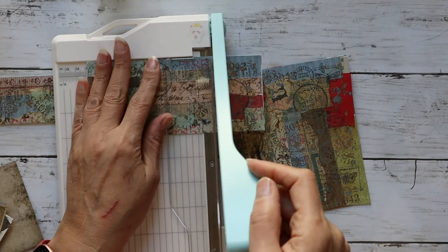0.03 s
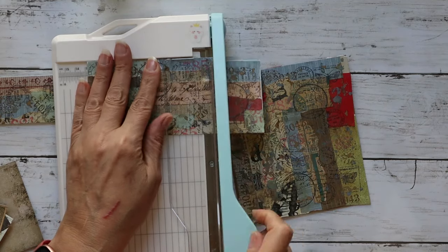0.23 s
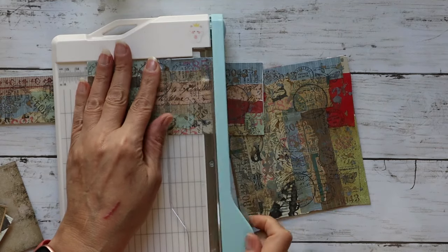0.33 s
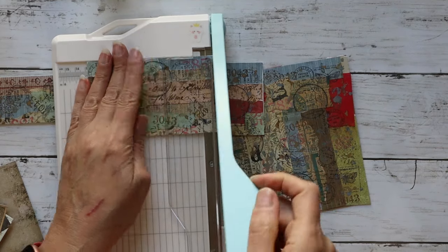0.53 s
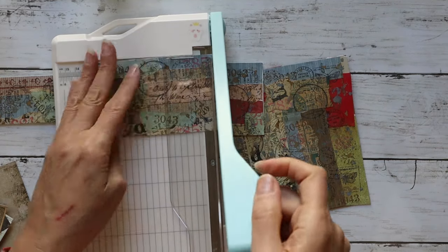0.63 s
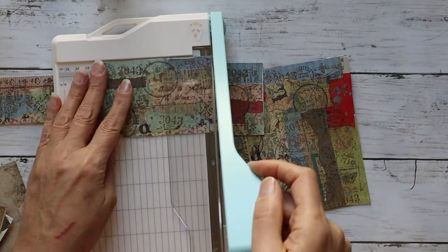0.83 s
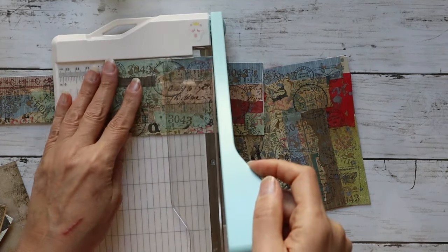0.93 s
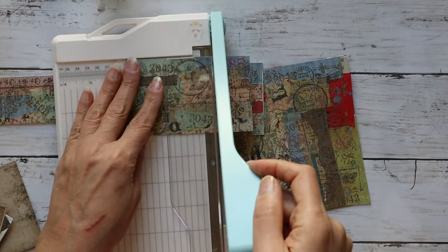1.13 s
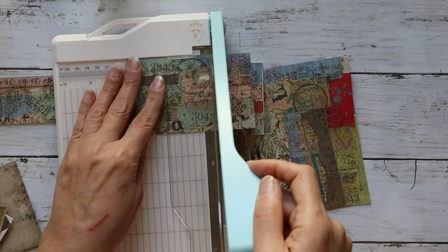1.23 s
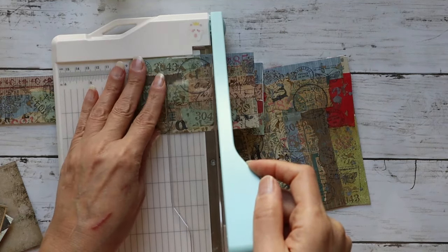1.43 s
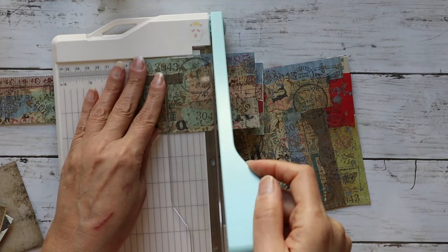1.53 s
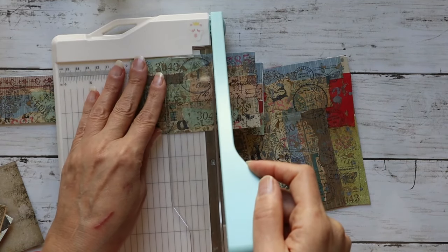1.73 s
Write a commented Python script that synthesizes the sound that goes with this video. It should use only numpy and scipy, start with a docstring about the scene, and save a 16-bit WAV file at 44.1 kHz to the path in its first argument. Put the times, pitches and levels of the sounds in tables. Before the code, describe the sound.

A paper trimmer blade crunches down through paper, then the paper slides softly.

```python
"""Paper trimmer on a craft table

Close up in a quiet room, on a pair of microphones. The lever blade shears down through paper and drags
back up, its edge sticking and slipping: fibres crunch, steel rings, the plastic base and table resonate.
Then a hand nudges and slides the paper, over a steady hush of room air."""
import sys
import numpy as np
from scipy import signal
from scipy.fft import rfft, irfft
from scipy.io import wavfile
from scipy.ndimage import uniform_filter1d

SR = 44100
rng = np.random.default_rng(int(sys.argv[2]) if len(sys.argv) > 2 else 0)


def wav_record(signal):
    """Record a signal, one row per channel, as 16-bit PCM in the file named by sys.argv[1]."""
    frames = np.transpose(np.atleast_2d(signal))
    bounded = np.clip(frames, -1, 1)
    # unit amplitude maps onto the largest positive 16-bit level
    quanta = np.round(bounded * 32767).astype(np.int16)
    wavfile.write(sys.argv[1], SR, quanta)


N = 79380
TIME_S = np.arange(N) / SR

# Blade travel down and back up, in stretches; base, table, thud and fizz are relative to level_db:
# time_s, level_db, base_db, base_pitch_hz, table_db, thud_db, fizz_db
BLADE_TRAVEL = [
    [(0.185, -70.5, -1, 660, 13, -9, -22), (0.203, -43.5, -26, 685, -8.5, -42, -10),
     (0.253, -36.5, -7.5, 580, -9, -37, -11), (0.266, -36, -1.5, 636, -13, -30, -7.5),
     (0.276, -34.5, -8.5, 634, -2, -16, -11), (0.304, -31.5, 3.5, 607, -7.5, -13, -8),
     (0.319, -28, -5, 639, -6.5, -26, -7), (0.33, -29.5, 1.5, 647, -0.5, -9.5, -9)],
    [(0.334, -34, 2, 648, -1.5, -13, -5), (0.344, -30.5, -8, 640, -5.5, -5, -2.5),
     (0.356, -33, -26, 655, -39, -14, -3.5), (0.364, -29, -6, 606, -32, -12, -5)],
    [(0.368, -30.5, -17, 613, -10, -18, -15), (0.374, -27.5, -1.5, 625, -20, -17, -25)],
    [(0.377, -33.5, 0, 645, -15, -21, -16), (0.382, -33, -5, 630, -2.5, -4, -20)],
    [(0.386, -38.5, -9, 604, -11.5, -6, -22), (0.412, -49.5, -4, 603, -19, -8.5, -47),
     (0.425, -56, 9, 570, -16, -10, -29)],
    [(0.431, -41.5, -11, 810, -28, -17, -17), (0.449, -30, -21, 810, -29, -27, -9.5),
     (0.475, -37, -32, 770, -28, -36, -3), (0.505, -38.5, 2.5, 747, -29, -41, -5.5)],
    [(0.51, -42, 1, 700, -27, -29, -6), (0.53, -45, 5, 731, -12, -32, -4.5),
     (0.552, -49.5, 1, 690, -11, -42, -9), (0.57, -58.5, -1.5, 700, -6, -29, -7.5),
     (0.592, -57.5, -27, 680, 2, -39, -4), (0.602, -59.5, -25, 710, -0.5, -18, -7),
     (0.628, -64, 0, 725, 0, -19, -8), (0.64, -59, -17, 730, -8, -1, -17)],
]
# Fibres parting under the edge: frequency_hz, density_db
SCRAPE_SPECTRUM = [(180, -52), (300, -16.5), (471, -21), (528, -12.5), (666, -4.5), (800, -4), (1000, -1.5),
                   (1400, -2.5), (2150, -1), (4500, -9.5), (6500, -21.5), (8450, -29), (14300, -120)]
# Steel rubbing on steel: frequency_hz, density_db
FIZZ_SPECTRUM = [(2940, -21), (5000, -4), (5760, 0.5), (6270, 2), (11300, -5), (14100, -21.5), (15500, -58)]
# Blade modes, each driven hardest as the biting point passes: pitch_hz, width_hz, gain_db, peak_s
BLADE_MODES = [(3220, 260, 14.5, 0.197), (1860, 370, 15, 0.25), (3780, 150, 5, 0.29), (7100, 640, 6, 0.285),
               (2220, 190, 21, 0.304), (4040, 790, 6, 0.3175), (5590, 275, 8, 0.355),
               (3670, 630, -7, 0.272), (8400, 600, -18, 0.8), (1590, 160, -9, 0.39), (3750, 350, 7, 0.369),
               (1070, 510, 10, 0.4), (1430, 460, 9, 0.427), (2400, 300, 11.5, 0.449),
               (5580, 260, 10, 0.455), (2260, 260, 16, 0.478)]
# Plastic base: pitch_ratio, width_hz, gain_db
BASE_MODES = [(0.618, 133, -11), (0.858, 69, 2), (1.04, 57, 2), (1.11, 60, -30)]
# Table top: pitch_hz, width_hz, gain_db
TABLE_MODES = [(177, 44, 7.5), (276, 178, 5.5), (367, 56, 5), (446, 98, -6)]
# Table frame, the deep thud: pitch_hz, width_hz, gain_db
FRAME_MODES = [(72, 8.7, -6), (84.7, 34, -1)]
# Sharp cracks with knocks on the base, from hard catches of the edge and from the hand's nudges of the paper:
# start_s, crack_db, crack_hz, knock_db, knock_hz
CRUNCHES = [(0.0575, -49, 2020, -39, 780), (0.2728, -33, 2130, -23, 662),
            (0.3115, -24, 2120, -18.5, 680), (0.3185, -27, 4130, -20.5, 559),
            (0.328, -34, 3600, -26, 663), (0.3516, -20, 3430, -27.5, 650),
            (0.356, -29.5, 5500, -40, 660), (0.3691, -24, 1920, -48, 600),
            (0.3735, -33.5, 3630, -21.5, 645), (0.4473, -25, 2340, -33, 1040),
            (0.461, -23, 2360, -32.5, 600), (0.481, -23.5, 2200, -54, 704),
            (0.5105, -36, 2190, -28, 773), (0.6645, -40, 2500, -38, 765),
            (1.4476, -49.5, 3540, -57, 444), (1.454, -50.5, 1480, -45, 1010)]
# Paper sliding over the base: time_s, level_db, base_db (relative to level_db), base_pitch_hz
PAPER_TRAVEL = [(0.84, -105, -22, 658), (0.858, -74.5, -9, 700), (0.924, -64, -20, 745),
                (0.962, -67, -9, 680), (0.992, -60.5, -0.5, 657), (1.026, -65.5, -14, 680),
                (1.044, -58.5, -39, 677), (1.068, -61, -1.5, 650), (1.084, -64, -23, 710),
                (1.104, -59.5, -15, 666), (1.142, -58, -20, 810), (1.166, -54.5, 4, 854),
                (1.204, -60.5, -0.5, 685), (1.276, -85.5, 10.5, 674), (1.284, -78, -10, 676),
                (1.3, -88, -18, 672)]
# Hiss of sliding paper: frequency_hz, density_db
HISS_SPECTRUM = [(290, -75), (500, -16.5), (823, -12.5), (922, -11), (1610, -15.5), (1720, -5),
                 (1880, -14.5), (3560, -12), (7000, -21), (11000, -26), (12500, -38), (15000, -48)]
# Modes of the sliding sheet: pitch_hz, width_hz, gain_db, best_contact_s
SHEET_MODES = [(2940, 190, 1, 1.3), (1723, 53, 7, 1.037), (3980, 420, -9, 1.05), (3110, 76, -6, 1.116),
               (3580, 1200, -11.5, 1.17), (2190, 430, -4.5, 1.19)]
# Pushes of the hand on the paper: start_s, length_s, sheet_db, fade_db, from_hz, to_hz, sheet_width_hz,
# base_db, base_hz, base_width_hz, rustle_db, thump_db
PAPER_NUDGES = [(0.053, 0.0056, -68.5, 6, 1890, 1700, 1400, -59.5, 704, 169, -56.5, -67),
                (0.645, 0.027, -49.5, 1, 2910, 2270, 820, -58.5, 750, 172, -49.5, -68),
                (0.753, 0.01, -90, -14, 2080, 2080, 1396, -71, 606, 200, -89, -50.5),
                (1.44, 0.018, -50.5, -3.5, 2250, 2150, 400, -52.5, 1000, 800, -82, -64),
                (1.492, 0.053, -72, -4, 3340, 3000, 1410, -69, 780, 300, -76, -84),
                (1.546, 0.019, -65, 5, 2780, 1600, 1800, -68, 1170, 200, -71, -68),
                (1.703, 0.0082, -83, -8, 1500, 1500, 1390, -91, 450, 300, -96, -58.5)]
# Rustle of a nudge: frequency_hz, density_db
RUSTLE_SPECTRUM = [(590, -33), (1000, 2), (1590, -10), (2530, -9), (3980, -7), (11000, -13.5), (15000, -32)]
# Room air: frequency_hz, density_db
ROOM_SPECTRUM = [(15, -47), (25, -6), (107, -4), (320, -7), (519, -8), (594, -7.5), (736, -9.5), (889, -12),
                 (1740, -15), (2670, -19.5), (2900, -19.5), (4110, -23.5), (11000, -36.5), (15300, -53)]


def blade():
    """The edge sticks and slips, shaking blade and table; returns that and the plastic base apart."""
    travel = sum(BLADE_TRAVEL, [])
    level_db = curve(travel, 1)
    fine, catches = slips(per_s=5000, spread_db=2), slips(per_s=1500, spread_db=2.66)
    scrape = gain_of(level_db) * coloured(fine, SCRAPE_SPECTRUM)
    bite = contact(BLADE_MODES, reach_s=0.012)
    steel = struck(fine, gain_of(level_db + 4.5) * bite, BLADE_MODES)
    rubbing = coloured(slips(per_s=11000, spread_db=3), FIZZ_SPECTRUM)
    fizz = gain_of(level_db + curve(travel, 6)) * rubbing
    base = pressed(catches, level_db + curve(travel, 2), BASE_MODES, curve(travel, 3, outside=650))
    table = pressed(catches, level_db + curve(travel, 4), TABLE_MODES)
    thud = pressed(catches, level_db + curve(travel, 5), FRAME_MODES)
    return scrape + steel + fizz + filtered(table, "high", hz=134) + thud, base


def crunches(crack_fall_s=0.004, crack_width_hz=900, knock_rise_s=0.002, knock_t60_s=0.04):
    """Each crunch, from the edge or a nudge: a burst of splinters around one pitch and a short ring of the
    base."""
    cracks, knocks, t = np.zeros(N), np.zeros(N), TIME_S[:4000]
    for start_s, crack_db, crack_hz, knock_db, knock_hz in CRUNCHES:
        at = round(start_s * SR)
        band = signal.iirpeak(crack_hz, crack_hz / crack_width_hz, SR)
        burst = signal.lfilter(*band, rng.standard_normal(len(t))) * np.exp(-t / crack_fall_s)
        cracks[at:at + len(t)] += gain_of(crack_db) * burst / abs(burst).max()
        swing = (1 - np.exp(-t / knock_rise_s)) * np.sin(2 * np.pi * knock_hz * t)
        knocks[at:at + len(t)] += gain_of(knock_db - 60 * t / knock_t60_s) * swing
    return cracks, knocks


def paper_slide():
    """Paper hisses over the base in fine grains that ring both sheet and plastic."""
    grains, level_db = slips(per_s=6000, spread_db=3.4), curve(PAPER_TRAVEL, 1)
    hiss = gain_of(level_db) * coloured(grains, HISS_SPECTRUM)
    touch = contact(SHEET_MODES, reach_s=0.02)
    sheet = struck(grains, gain_of(level_db + 4.5) * touch, SHEET_MODES)
    base_db, base_hz = level_db + curve(PAPER_TRAVEL, 2), curve(PAPER_TRAVEL, 3, outside=670)
    return hiss + sheet + struck(grains, gain_of(base_db), [(1, 98, 0)], base_hz)


def paper_nudges(rise_s=0.003, fall_s=0.006):
    """Short scuffs: rustle, a sheet resonance, a knock of the base and a thump in the table."""
    grains, out = slips(per_s=7000, spread_db=1.3), 0
    rustle = coloured(grains, RUSTLE_SPECTRUM)
    for (start_s, length_s, sheet_db, fade_db, from_hz, to_hz, sheet_width_hz,
         base_db, base_hz, base_width_hz, rustle_db, thump_db) in PAPER_NUDGES:
        age_s = TIME_S - start_s
        progress = np.clip(age_s / length_s, 0, 1)
        envelope = np.exp(np.minimum(age_s, 0) / rise_s - np.maximum(age_s - length_s, 0) / fall_s)
        envelope *= gain_of(fade_db * progress)
        scuff = grains * envelope
        sheet = ring(scuff, [(0.98, sheet_width_hz, 0)], from_hz + (to_hz - from_hz) * progress)
        base = ring(scuff * progress ** 0.12, [(base_hz, base_width_hz, 0), (base_hz * 0.52, 200, -4)])
        thump = ring(scuff, [(91, 50, 0)])
        parts = [(rustle_db, envelope * rustle), (sheet_db, sheet), (base_db, base), (thump_db, thump)]
        out += np.std(envelope) * sum(gain_of(db) * unit_rms(part) for db, part in parts)
    return out


def reflections(t60_s):
    """Sparse, dying echoes of random sign, a different set at each microphone."""
    echoes = np.zeros((2, 12000))
    at = np.arange(0, 12000, 12) + rng.integers(0, 12, (2, 1000))
    np.put_along_axis(echoes, at, rng.choice([-1., 1.], at.shape), 1)
    echoes *= gain_of(-60 * TIME_S[:12000] / t60_s)
    return echoes / np.linalg.norm(echoes, axis=1, keepdims=True)


def space(x, paths=12, shift_s=0.03, crossover_hz=99):
    """Close reflections shift as hand and blade move; both microphones share the bass."""
    out = mic_pair(filtered(x, "low", crossover_hz), lag_s=0.0022)
    upper = filtered(x, "high", crossover_hz)
    for k in range(paths):
        distance = abs((TIME_S / shift_s - k + 1) % paths - 1)
        crossfade = np.cos(np.pi / 2 * np.minimum(distance, 1))
        response = reflections(t60_s=0.024) + gain_of(-16) * reflections(t60_s=0.21)
        out += signal.fftconvolve((upper * crossfade)[None], response, axes=1)[:, :N]
    return out


def room_air(level_db=-60.5, drift_db=0.2):
    """Steady air noise, unrelated in the two microphones, drifting slightly in level."""
    drift = unit_rms(uniform_filter1d(rng.standard_normal(N), 3000))
    air = np.array([coloured(noise, ROOM_SPECTRUM) for noise in rng.standard_normal((2, N))])
    return gain_of(level_db + drift_db * drift) * air


def slips(per_s, spread_db):
    """Friction as random clicks of uneven size."""
    size = gain_of(spread_db * np.minimum(rng.exponential(1, N), 4)) * rng.choice([-1., 1.], N)
    return unit_rms(size * (rng.random(N) < per_s / SR))


def contact(modes, reach_s):
    """How strongly each mode is driven as the point of contact passes by."""
    peak_s = np.array(modes)[:, 3:]
    return np.exp(-0.5 * ((TIME_S - peak_s) / reach_s) ** 2)


def ring(drive, modes, pitch=1):
    """Summed resonances (frequency, width_hz, gain_db); pitch multiplies each frequency."""
    out, drives = 0, drive * np.ones((len(modes), 1))
    for push, (frequency, width_hz, db, *_) in zip(drives, modes):
        carrier = np.exp(2j * np.pi * np.cumsum(frequency * pitch * np.ones(N)) / SR)
        pole = np.exp(-np.pi * width_hz / SR)
        amplitude = signal.lfilter([(1 - pole) ** 2], [1, -2 * pole, pole * pole], push / carrier)
        out += gain_of(db) * 2 * (carrier * amplitude).real
    return out


def struck(clicks, gain, modes, pitch=1):
    """Clicks under a gain curve set modes ringing freely."""
    return ring(clicks * gain, modes, pitch) / np.std(ring(clicks, modes, np.mean(pitch)))


def pressed(clicks, level_db, modes, pitch=1, steady_s=0.021):
    """A body kept ringing by steady pressure: its loudness follows the level curve."""
    body = ring(clicks, modes, pitch)
    power = abs(uniform_filter1d(body ** 2, round(steady_s * SR)))
    return gain_of(level_db) * body / np.sqrt(power + 1e-20)


def coloured(x, spectrum):
    """Gives x a spectrum that falls away beyond its ends, at rms 1."""
    hz, db = np.transpose(spectrum)
    log_hz = np.log(np.fft.rfftfreq(N, 1 / SR) + 1)
    beyond = np.maximum(np.log(hz[0]) - log_hz, 0) + np.maximum(log_hz - np.log(hz[-1]), 0)
    shape_db = np.interp(log_hz, np.log(hz), db) - 23.6 * beyond
    return unit_rms(irfft(rfft(x) * gain_of(shape_db), N))


def curve(rows, column, outside=-120):
    """One column of a table, interpolated over time."""
    columns = np.transpose(rows)
    return np.interp(TIME_S, columns[0], columns[column], outside, outside)


def mic_pair(x, lag_s):
    """Sound reaches the left microphone first, the right lag_s later."""
    return np.array([x, np.interp(TIME_S - lag_s, TIME_S, x)])


def filtered(x, kind, hz, order=2):
    """Low-pass or high-pass."""
    return signal.sosfilt(signal.butter(order, hz, kind, fs=SR, output="sos"), x)


def gain_of(db):
    """dB to gain."""
    return 10 ** (np.asarray(db) / 20)


def unit_rms(x):
    """Scales to rms 1."""
    return x / np.sqrt(np.mean(x ** 2) + 1e-20)


def scene():
    """Trimmer and paper close by, room air behind; the base reaches the microphones almost directly."""
    edge, base = blade()
    cracks, knocks = crunches()
    plastic = base + knocks
    scattered = edge + cracks + gain_of(-10) * plastic + paper_slide() + paper_nudges()
    return gain_of(3.5) * space(scattered) + mic_pair(plastic, lag_s=0.00025) + room_air()


def record(dry):
    """The microphones cut the bass and pass nothing much above 15.5 kHz."""
    bass_cut = filtered(dry, "high", hz=61, order=3)
    band_limit = signal.firwin(511, 15500, window=("kaiser", 9), fs=SR)
    return signal.oaconvolve(bass_cut, band_limit[None], "same")


dry = scene()
out = record(dry)
wav_record(out)
```